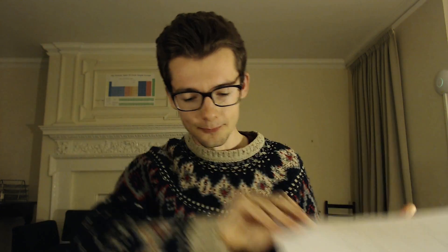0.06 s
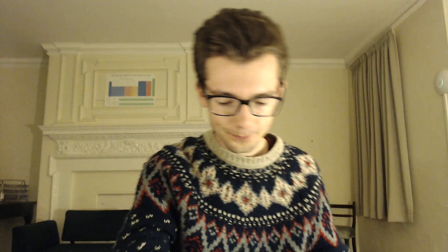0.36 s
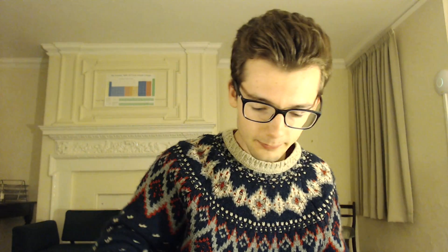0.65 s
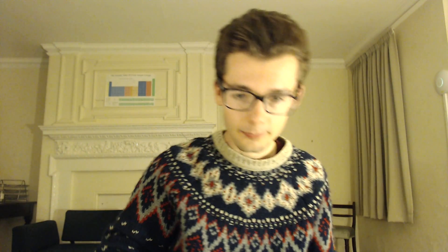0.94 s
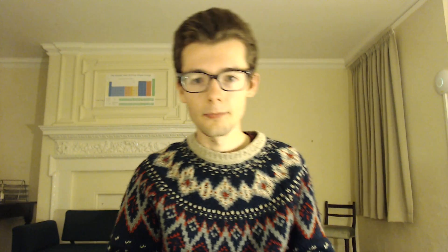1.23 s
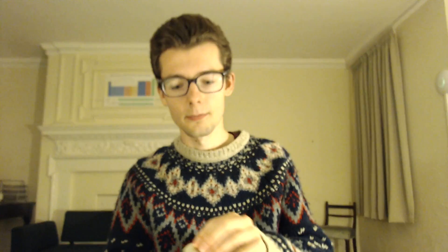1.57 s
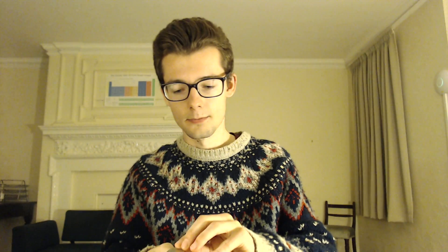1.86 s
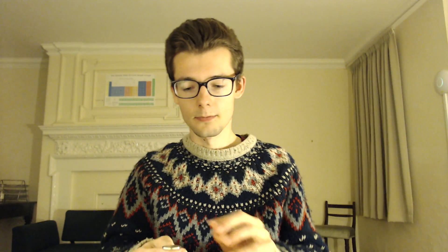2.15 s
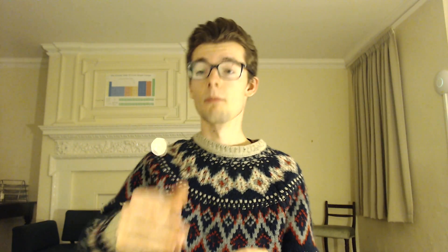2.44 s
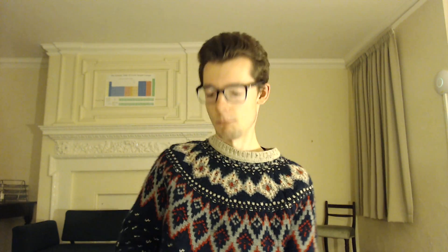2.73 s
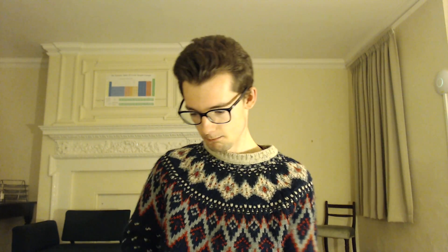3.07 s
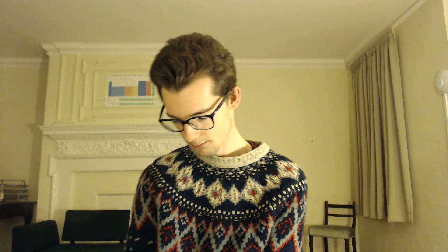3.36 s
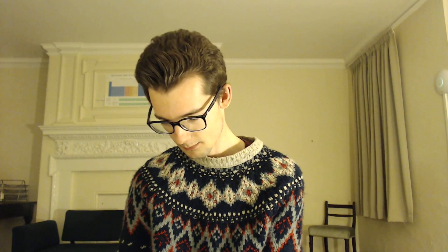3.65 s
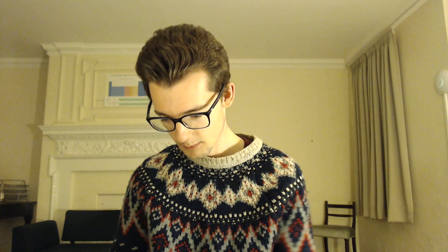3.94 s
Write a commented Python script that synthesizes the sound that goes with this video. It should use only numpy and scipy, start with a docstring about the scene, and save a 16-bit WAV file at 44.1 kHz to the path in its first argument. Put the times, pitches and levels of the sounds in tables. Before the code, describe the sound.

A coin bouncing on a desk is the main sound, close by in a quiet room. First, a sleeve brushes faintly and paper slides with a crinkle from about 0.7 to 0.9 seconds. A thumbnail flick clicks at 2.4 seconds. The coin lands loudly at 2.7 with a high ring, bounces at 3.0 and 3.2, then rattles faster and softer until about 3.9 seconds.

```python
"""At a desk in a quiet room, a sheet of paper is slid aside and a coin is flicked into the air.
The paper hisses by stick-slip friction. The coin lands hard near the microphone, bounces ever lower
and rattles to rest, its three free modes throbbing as it tumbles. Each impact excites the modes of
the desk and the reverberation of the room; the hardest drive the microphone into saturation."""
import sys
import numpy as np
from scipy import signal
from scipy.fft import rfft, irfft
from scipy.io import wavfile

SR = 44100
rng = np.random.default_rng(int(sys.argv[2]) if len(sys.argv) > 2 else 0)


def store_pcm(level_fs):
    """Save levels as 16-bit WAV."""
    pcm = np.round(np.clip(level_fs, -1, 1) * 32767).astype(np.int16)
    wavfile.write(sys.argv[1], SR, np.atleast_2d(pcm).T)


N = 176400
T = np.arange(N) / SR

# Free modes of the coin. Each row: frequency in Hz, t60 (time to decay by 60 dB) in seconds.
COIN_MODES = [(8668, 0.66), (8905, 0.86), (15110, 0.26)]
# Flights between blows. Each row: start in seconds, turns per second, starting angle in radians,
# level in dB of the low, middle and high mode.
FLIGHTS = [(2.354, 12, -0.69, -62, -52, -53), (2.731, 38.4, 0.97, -5.5, -8.5, -4),
           (3.005, 5.2, -0.094, -11.5, -12, -11), (3.209, 8.55, -0.64, -20.5, -11, -5.5),
           (3.338, 4.3, 0.25, -18, -22.5, -16.5), (3.491, 4.7, 0.011, -30.5, -32, -27),
           (3.605, 1.2, -0.55, -26.5, -33.5, -22), (3.695, 2.8, -0.34, -27.5, -33, -28),
           (3.77, 1.6, -1, -24, -32.5, -21), (3.836, 2.4, -0.49, -33, -37, -27)]
# The coin slaps the desk. Each row: start in seconds, level in dB, chatter length in seconds,
# brightness in dB, frame thud in dB, panel boom in dB.
SLAPS = [(2.7294, 17, 0.0026, 8.5, -18.5, -30), (3.0028, 11, 0.0073, 2, -29, -25.5),
         (3.1993, 3, 0.0031, -9, -31, -30.5), (3.21, 8, 0.0015, -7, -36.5, -32.5),
         (3.218, 1.5, 0.0041, 4, -48, -38), (3.3396, 0.5, 0.0039, -1.5, -54, -37),
         (3.489, 0, 0.0047, -4.5, -52, -44.5), (3.6015, 0, 0.0048, 0, -43, -55),
         (3.6982, 0.5, 0.0023, 1.5, -47, -50), (3.7703, -1, 0.0054, 1.5, -47, -47),
         (3.8348, 0, 0.0015, 9, -50, -48), (3.8692, -8.5, 0.0034, 5, -56, -56)]
# The rim touches the desk. Each row: start in seconds, level in dB, brightness in dB.
RIM_TICKS = [(3.3197, -6, 6), (3.3352, -1, 13), (3.3502, -5.5, 6), (3.3883, -8.5, -19), (3.4128, -8, -31),
             (3.4330, -7, -22), (3.4539, -11.5, -11), (3.4833, -11.5, 3), (3.4870, -8, -7),
             (3.4964, -1.5, 0), (3.5317, -9.5, -24), (3.5535, -9.5, -29), (3.5747, -12.5, -16),
             (3.5990, -11, -3), (3.6111, -20.5, 8), (3.6288, -15, -14), (3.6453, -15.5, 0),
             (3.6588, -17.5, -12), (3.6735, -15.5, -8), (3.6952, -6, 16), (3.7143, -17, 9),
             (3.7371, -14, 6.5), (3.7597, -14.5, 0), (3.7852, -14, 4), (3.8147, -14.5, 2), (3.8524, -24, 7)]

# Impulses. Each row: start in seconds, level in dB.
FLICKS = [(2.356, -8.5), (2.3635, -19.5)]  # thumbnail on the coin
CRINKLES = [(.6775, -9), (.8005, -6), (.8213, -25), (.842, -6.5), (.8647, -8), (.8922, -17), (.8945, -19)]  # the sheet's edge catches
TAPS = [(.964, -52), (1.195, -51)]  # light touches on the desk top
BUMPS = [(.002, -55.5), (.415, -66)]  # soft nudges against the desk

# Damped modes. Each row: frequency in Hz, gain in dB, t60 in seconds.
TOP_MODES = [(1444, -27.5, 0.046), (1757, -26.5, 0.033), (2089, -20.5, 0.034), (2362, -27.5, 0.032),
             (2670, -24.5, 0.031), (3164, -32, 0.041), (3640, -23, 0.034), (3912, -26, 0.043),
             (4750, -27.5, 0.04)]
PANEL_MODES = [(309, -1.5, 0.087), (401, 1.5, 0.1), (702, 0.5, 0.096), (838.5, -0.5, 0.09)]
FRAME_MODES = [(30.4, 8, 0.068), (49.6, 3.5, 0.097), (85, -4, 0.074), (124.3, -8, 0.1), (216.4, -9, 0.15)]
SETTLE_MODES = [(2108, -29.5, 0.054)]  # the spot where the coin settles
BUMP_MODES = [(122, 1.5, 0.15), (632, 1.5, 0.31), (726, 2.5, 0.27)]
SHEET_MODES = [(1830, -5.5, 0.043), (2333, -2, 0.019), (3080, -2, 0.042), (5150, -5.5, 0.02)]

# Envelopes. Each row: time in seconds, relative level in dB.
KNOCK_ENVELOPE = [(2.73, -10), (3.0, -1.5), (3.3, 0.6)]  # the top answers more as the coin wanders over it
SLIDE_ENVELOPE = [(0.668, -68), (0.676, -37.5), (0.774, -42.5), (0.8, -29), (0.872, -36), (0.884, -90),
                  (0.892, -30), (0.904, -77), (1.03, -100)]  # the paper's hiss
SHEET_ENVELOPE = [(.668, -82), (.677, -37.5), (.735, -35), (.78, -45), (.84, -40.5), (.88, -42), (.91, -58)]  # the paper's resonances
BRUSH_ENVELOPE = [(0.0, -55), (0.196, -83.5), (0.274, -66), (0.398, -81), (0.438, -65), (0.486, -79),
                  (0.66, -83), (0.676, -62), (0.884, -56), (0.948, -61.5), (0.968, -53.5), (1.01, -69.5),
                  (1.1, -79)]  # sleeve and hand

# Spectra. Each row: frequency in Hz, relative level in dB.
CLICK_SPECTRUM = [(100, -21), (400, -6.5), (900, -3.5), (1600, 4.5), (3000, 9), (5000, 11.5), (7000, 8.5),
                  (10000, 6.5), (13000, 3), (16000, -7)]
FLICK_SPECTRUM = [(200, -47), (1500, -9.5), (5000, -12.5), (7000, 0.5), (8800, 5), (11000, -20),
                  (14000, -14), (15100, 4), (16000, -16)]
SLIDE_SPECTRUM = [(200, -51), (500, -26), (1000, -11), (1800, 2.5), (2600, 4), (3400, 0.5), (3800, 5.5),
                  (5100, 5), (6000, -1), (8100, -8.5), (9300, -6), (11000, -20), (16000, -27.5)]
BRUSH_SPECTRUM = [(40, -29), (120, -11.5), (300, -8.5), (500, -3.5), (680, -0.5), (900, -4), (1500, -0.5),
                  (2600, -4.5), (4000, -15), (16000, -46)]
HISS_SPECTRUM = [(15, -59.5), (25, 4), (58, -5), (300, -12), (754, -6.5), (1520, -1.5), (4100, -5),
                 (5250, -10), (6100, -8), (7600, -9), (10000, -15), (11200, -19.5), (16000, -29)]

# Reverberation of the room. Each row: frequency in Hz, gain in dB, t60 in seconds.
ROOM_BANDS = [(100, 0, 0.84), (427, 4, 0.33), (840, 1, 0.4), (2550, -3, 0.3), (5200, -8.5, 0.3),
              (8250, -7, 0.21), (12800, -9.5, 0.16), (16400, -30.5, 0.26)]
# Faint steady tones. Each row: frequency in Hz, rms level in dB.
WHINE_TONES = [(2918, -77.5), (3354, -86.5)]

GRAVITY, SOUND_SPEED = 9.81, 343  # m/s^2, m/s
CHATTER_GAP_S = 0.0012  # mean spacing of the rebounds within a slap
LN_1000 = np.log(1000)  # exponent of a 60 dB decay


def coin(rest_s=3.86, build_s=0.00072, damp_s=0.0034, wobble=0.38, image=0.17, slant=0.346):
    """Free vibration of a disc: tumbling modulates its amplitude, rise and fall give a Doppler shift."""
    out = np.zeros(N)
    ends = [row[0] for row in FLIGHTS[1:]] + [rest_s]
    for (start, turns, start_angle, *levels), end in zip(FLIGHTS, ends):
        first = int(start * SR)
        t = T[:min(N - first, SR // 2)]
        # One blow builds the ring and the next stops it.
        gate = (1 - np.exp(-t / build_s)) * np.exp(-np.maximum(t - (end - start), 0) / damp_s)
        angle = start_angle + 2 * np.pi * turns * t
        height = np.maximum(GRAVITY / 2 * t * (end - start - t), 0)
        approach = slant * height  # metres nearer the microphone
        for (hz, t60), db in zip(COIN_MODES, levels):
            tilt, phase = rng.uniform(0, 2 * np.pi, 2)
            # A second, slower rotation fills the nulls of the tumble.
            facing = np.cos(angle) + 1j * wobble * np.cos(0.29 * angle + tilt)
            doppler = np.exp(2j * np.pi * hz * approach / SOUND_SPEED)
            paths = doppler + image / doppler  # the image source in the desk moves the opposite way
            mode = np.exp(1j * (2 * np.pi * hz * t + phase) - LN_1000 * t / t60)
            out[first:first + len(t)] += amp(db) * gate * np.real(facing * paths * mode)
    return out


def contact_force(chatter_db=-2):
    """Inelastic impact: a rim tick is one pulse, a slap is followed by quick, dying rebounds."""
    rows = list(RIM_TICKS)
    for start, db, length, bright_db, *_ in SLAPS:
        rows.append((start, db, bright_db))
        for k, (late, strength) in enumerate(rng.uniform(-1, 1, size=(8, 2))):
            delay = CHATTER_GAP_S * (k + 1 + late / 2)
            loss_db = min(8 * (delay / length) ** 4, 80)
            rows.append((start + delay, db + chatter_db + 2 * strength - loss_db, bright_db))
    return strike(rows)


def strike(rows, bright_hz=6330):
    """Harder impacts hold more treble. Each row: start in seconds, level in dB, brightness in dB."""
    soft = impulses([(start, db) for start, db, _ in rows])
    hard = impulses([(start, db + bright_db) for start, db, bright_db in rows])
    highpass = signal.butter(2, bright_hz, "high", fs=SR, output="sos")
    treble = signal.sosfilt(highpass, signal.sosfilt(highpass, hard + 1e-18))
    return lowpass(lowpass(soft, bright_hz), bright_hz) + treble


def clack(force, echo_s=0.0028, echo_hz=2960, scatter_t60=0.014, scatter_hz=6450):
    """Early reflection: a click is followed by a dull echo and by scattering from things on the desk."""
    click = colour(force, CLICK_SPECTRUM)
    echo = np.interp(T - echo_s, T, lowpass(click, echo_hz), left=0)
    retained = np.exp(-2 * LN_1000 / (scatter_t60 * SR))
    energy = signal.lfilter([1 - retained], [1, -retained], lowpass(force, scatter_hz) ** 2 + 1e-18)
    scatter = colour(np.sqrt(energy) * rng.standard_normal(N), CLICK_SPECTRUM)
    return click + amp(4) * lowpass(scatter, scatter_hz) + amp(-11.5) * echo


def desk(force, settle_s=3.38):
    """Modal response: contacts and taps ring the top; slaps also excite the panel and the frame."""
    knock = force * amp(np.interp(T, *np.transpose(KNOCK_ENVELOPE))) + impulses(TAPS)
    top = ring(knock, TOP_MODES) + ring(knock * (T > settle_s), SETTLE_MODES)
    boom = ring(impulses([(start, db) for start, *_, db in SLAPS]), PANEL_MODES)
    thud = ring(impulses([(start, db) for start, *_, db, _ in SLAPS]), FRAME_MODES)
    return top + boom + thud


def thumbnail():
    """Impulsive excitation: the nail clicks brightly against the coin."""
    return colour(impulses(FLICKS), FLICK_SPECTRUM)


def paper(snags_per_s=1100, snag_spread_db=7, slip_hz=346, slip_db=3):
    """Stick-slip friction: rough noise and tiny snags hiss and ring the sheet; its edge crinkles."""
    sizes = amp(snag_spread_db * np.minimum(rng.exponential(1, N), 2)) * rng.choice([-1, 1], N)
    snags = unit(sizes * (rng.random(N) < snags_per_s / SR))
    grip = unit(amp(slip_db * unit(lowpass(rng.standard_normal(N), slip_hz))))
    friction = grip * rng.standard_normal(N) + amp(0.5) * snags
    hiss = amp(0.5) * envelope(SLIDE_ENVELOPE) * unit(colour(friction, SLIDE_SPECTRUM))
    resonance = envelope(SHEET_ENVELOPE) * unit(ring(friction, SHEET_MODES))
    return hiss + resonance + colour(impulses(CRINKLES), SLIDE_SPECTRUM)


def sleeve():
    """Friction noise: sleeve and hand brush dully over the desk as the arm moves the sheet."""
    return amp(4.5) * envelope(BRUSH_ENVELOPE) * unit(colour(rng.standard_normal(N), BRUSH_SPECTRUM))


def nudges():
    """Modal response: soft bumps ring low modes of the desk."""
    return ring(impulses(BUMPS), BUMP_MODES)


def radiated_cracks(tick_db=2.5, slap_db=1.55):
    """Energy summation: over all directions, a contact's chatter reaches the room as one crack."""
    rows = [(start, db + tick_db, bright_db) for start, db, bright_db in RIM_TICKS]
    for start, db, length, bright_db, *_ in SLAPS:
        chatter_db = 10 * np.log10(1 + length / CHATTER_GAP_S / 2)
        rows.append((start, db + slap_db + chatter_db, bright_db))
    return colour(strike(rows), CLICK_SPECTRUM)


def room(x, bands=16):
    """Diffuse reverberation: the field swells after the first wall and dies sooner in the treble."""
    hz = np.linspace(0, SR / 2, SR // 2 + 1)
    centres = np.geomspace(60, 17000, bands)
    points_hz, levels, t60s = np.transpose(ROOM_BANDS)
    response = 0
    for centre, selector in zip(centres, np.eye(bands)):
        decay = np.exp(-LN_1000 * T[:SR] / at_hz(centre, points_hz, t60s))
        tail = unit(rng.standard_normal(SR) * decay) / np.sqrt(SR)  # unit energy
        weight = np.sin(np.pi / 2 * at_hz(hz, centres, selector))
        response += amp(at_hz(centre, points_hz, levels)) * irfft(rfft(tail) * weight)
    swell = np.interp(T[:SR], [.003, .012, .6, .8], [0, 1, 1, 0])
    return signal.fftconvolve(x, response * swell)[:N]


def background(hiss_db=-64):
    """Noise floor: broadband microphone hiss with a faint tonal whine."""
    whine = sum(amp(db) * np.sqrt(2) * np.sin(2 * np.pi * hz * T) for hz, db in WHINE_TONES)
    return amp(hiss_db) * unit(colour(rng.standard_normal(N), HISS_SPECTRUM)) + whine


def ring(x, modes):
    """Modal superposition: damped resonators driven by x add with alternating sign."""
    out = 0
    for k, (hz, db, t60) in enumerate(modes):
        radius, step = np.exp(-LN_1000 / (t60 * SR)), 2 * np.pi * hz / SR
        feedback = [1, -2 * radius * np.cos(step), radius * radius]
        out += (-1) ** k * amp(db) * signal.lfilter([0, np.sin(step)], feedback, x + 1e-18)
    return out


def colour(x, spectrum, size=4096):
    """Minimum-phase filtering: folding the cepstrum gives a causal filter with the given spectrum."""
    hz = np.linspace(0, SR / 2, size // 2 + 1)
    cepstrum = irfft(np.log(amp(at_hz(hz, *np.transpose(spectrum)))))
    cepstrum[1:size // 2] *= 2
    cepstrum[size // 2 + 1:] = 0
    return signal.fftconvolve(x, irfft(np.exp(rfft(cepstrum))))[:N]


def lowpass(x, hz):
    """Second-order low-pass filtering."""
    return signal.sosfilt(signal.butter(2, hz, fs=SR, output="sos"), x + 1e-18)


def impulses(rows):
    """Ideal impulses. Each row: start in seconds, level in dB."""
    starts, levels = np.transpose(rows)
    return np.bincount((starts * SR).astype(int), amp(levels), N)[:N]


def envelope(rows):
    """Gain by interpolation in decibels, silent outside the given times."""
    return amp(np.interp(T, *np.transpose(rows), left=-120, right=-120))


def at_hz(hz, points_hz, values):
    """Interpolation on a logarithmic frequency axis."""
    return np.interp(np.log(hz + 1), np.log(points_hz), values)


def amp(db):
    """Amplitude ratio of a level in decibels."""
    return 10 ** (np.asarray(db) / 20)


def unit(x):
    """Normalisation to an rms of 1."""
    return x / np.sqrt(np.mean(x ** 2) + 1e-20)


def scene():
    """Superposition of direct sound, reverberation and hiss; the desk is heard mostly directly."""
    force = contact_force()
    clacks, body = clack(force), desk(force)
    flick, ringing, sheet = thumbnail(), coin(), paper()
    direct = clacks + body + flick + ringing + sheet
    impacts = radiated_cracks() + flick + amp(-11.5) * body
    reverb = room(amp(-5.5) * impacts + amp(5.5) * ringing + amp(-4) * sheet)
    return (direct + reverb + sleeve() + nudges() + background())[None]


def record(dry, overload=0.48, cutoff_hz=16000):
    """Saturation and band limiting: the microphone flattens the loudest peaks; the top is cut."""
    oversampled = signal.resample_poly(dry, 2, 1, axis=-1)
    saturated = oversampled / (1 + (oversampled / overload) ** 4) ** (1 / 4)
    clipped = signal.resample_poly(saturated, 1, 2, axis=-1)
    return signal.sosfilt(signal.ellip(8, .2, 70, cutoff_hz, fs=SR, output="sos"), clipped)


dry = scene()
out = record(dry)
store_pcm(out)
```